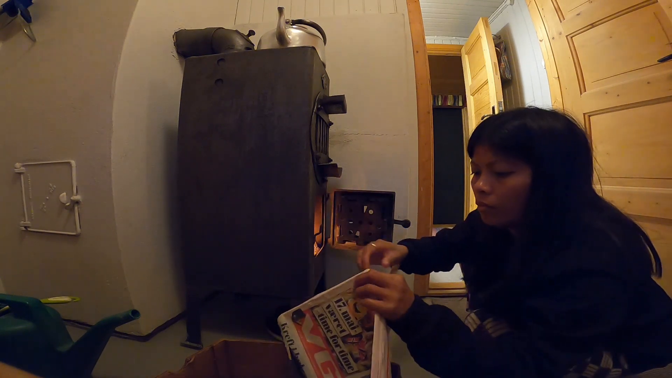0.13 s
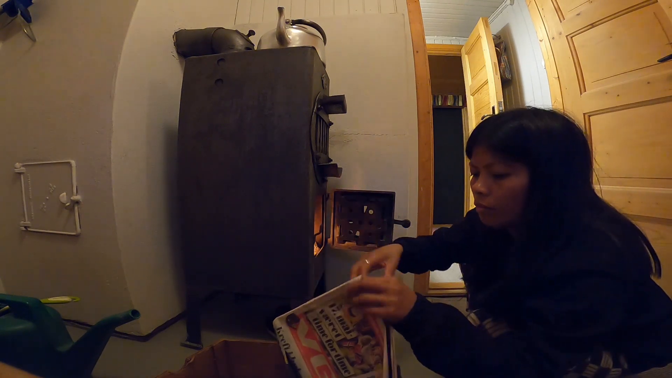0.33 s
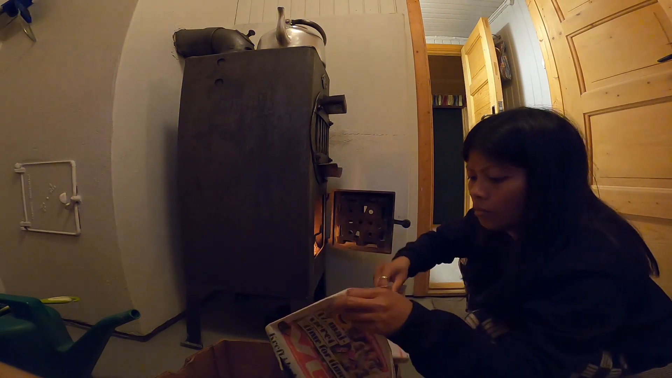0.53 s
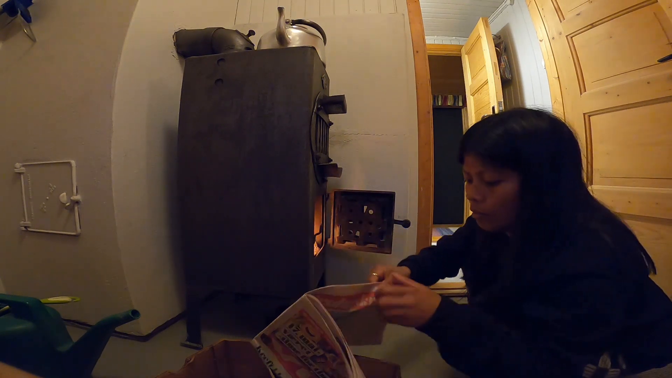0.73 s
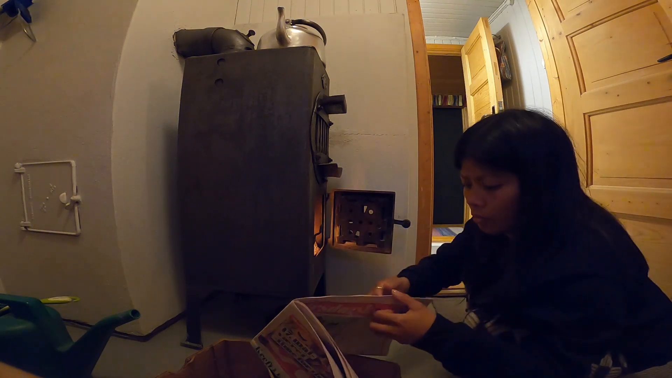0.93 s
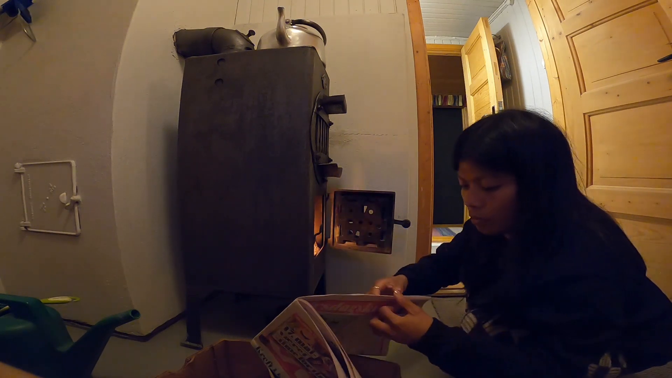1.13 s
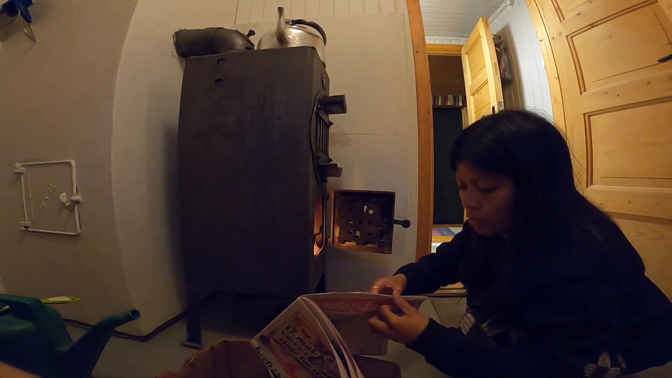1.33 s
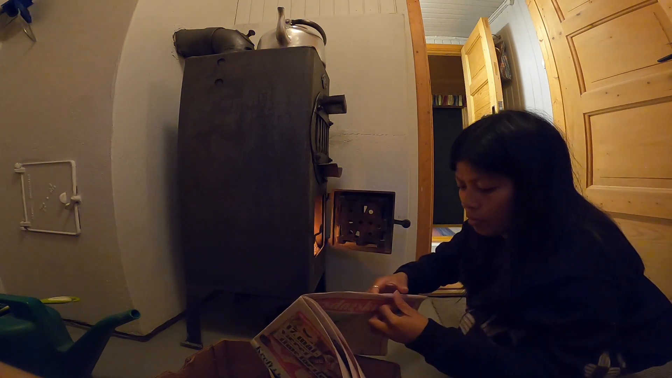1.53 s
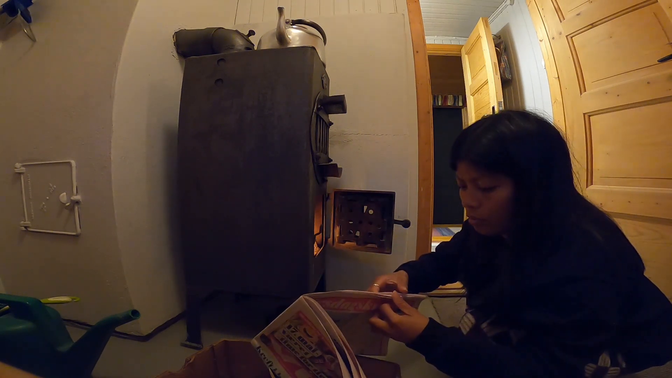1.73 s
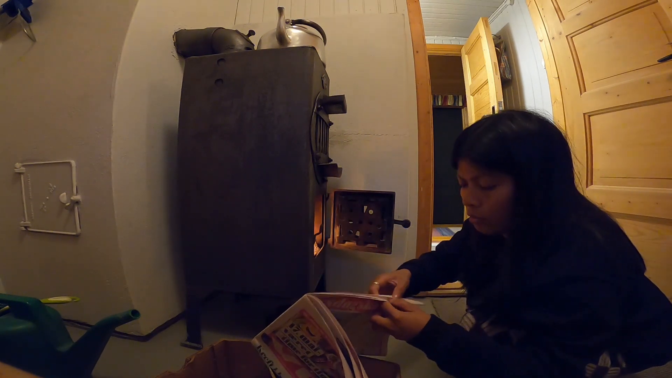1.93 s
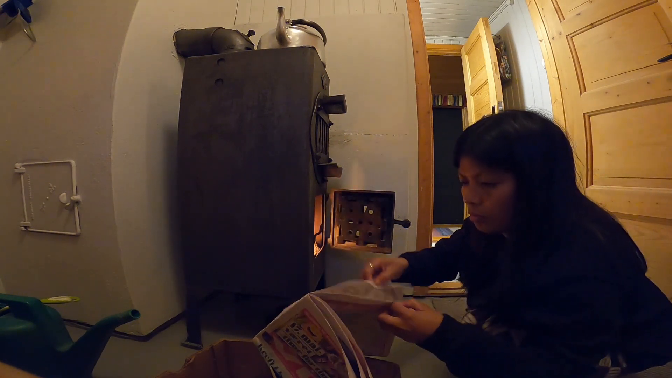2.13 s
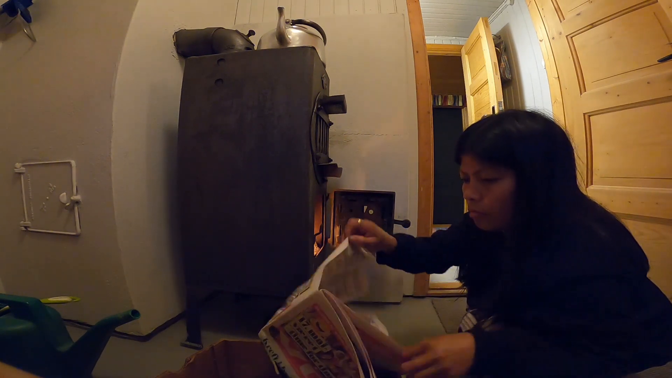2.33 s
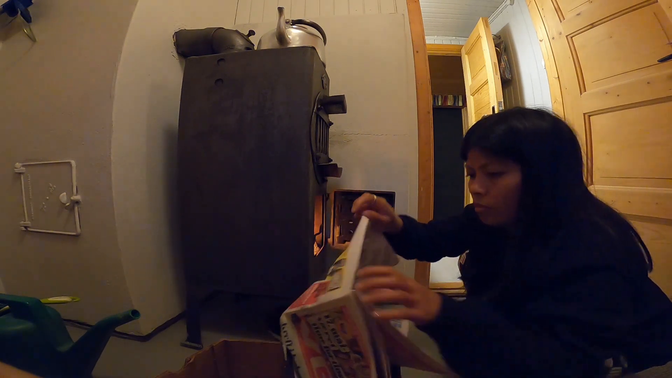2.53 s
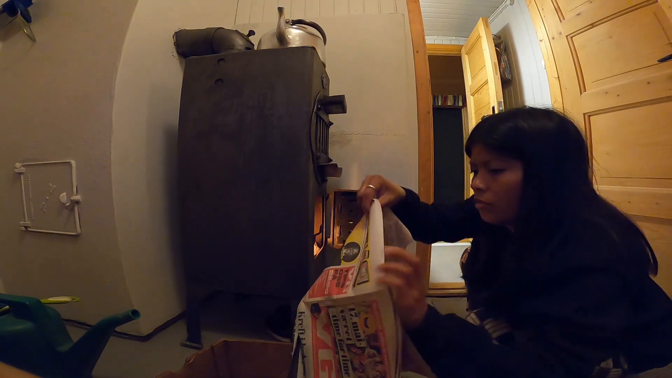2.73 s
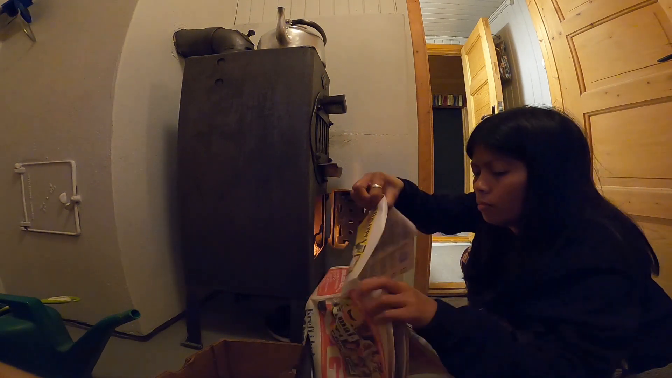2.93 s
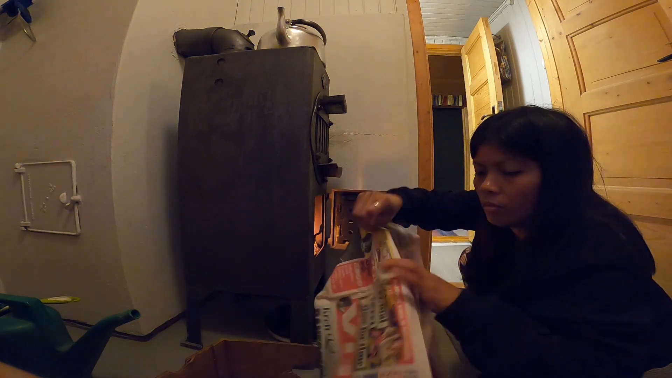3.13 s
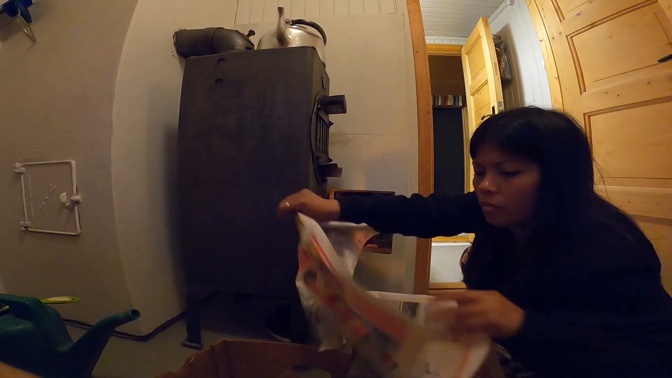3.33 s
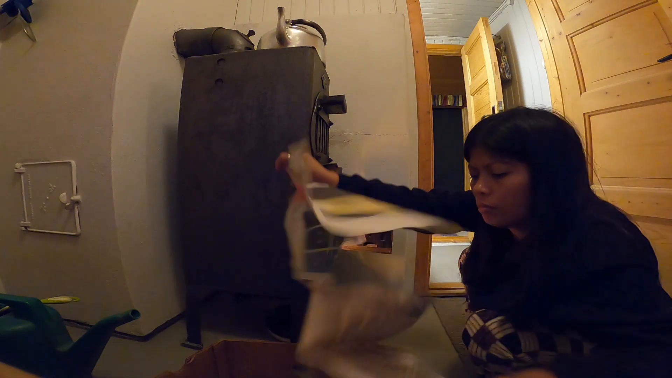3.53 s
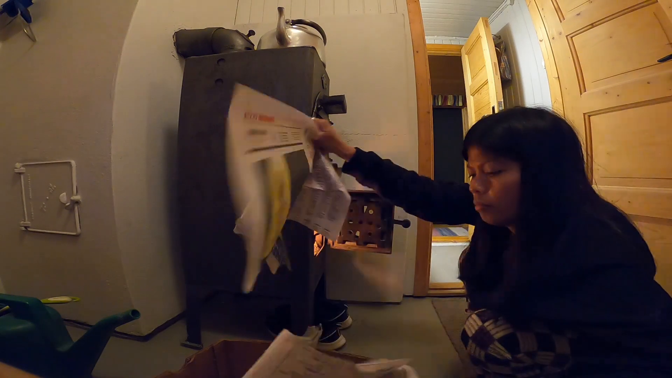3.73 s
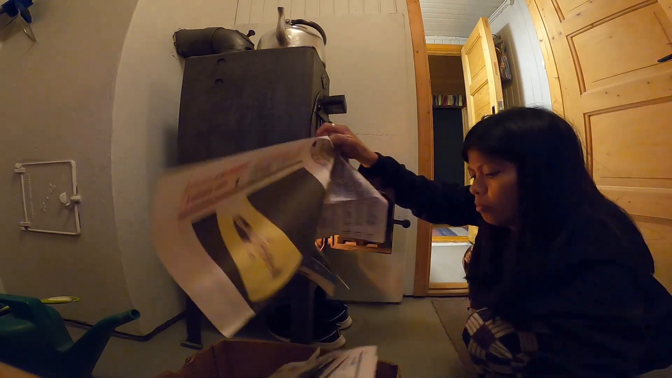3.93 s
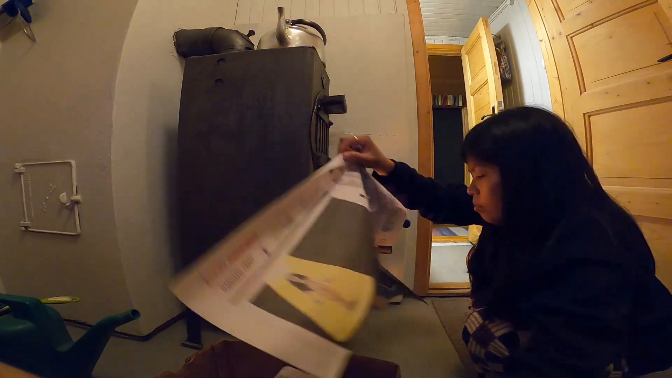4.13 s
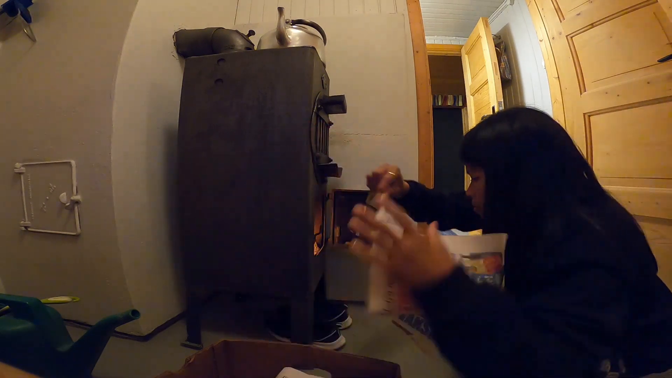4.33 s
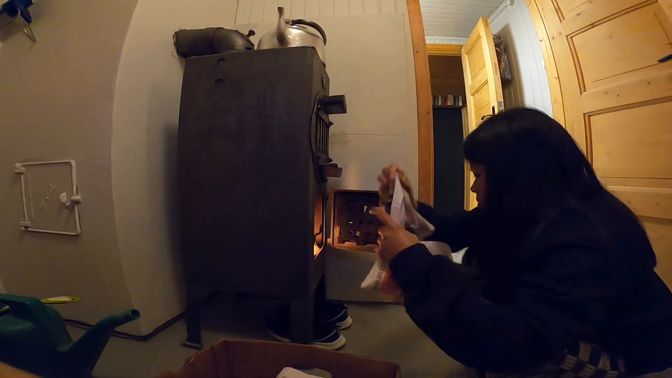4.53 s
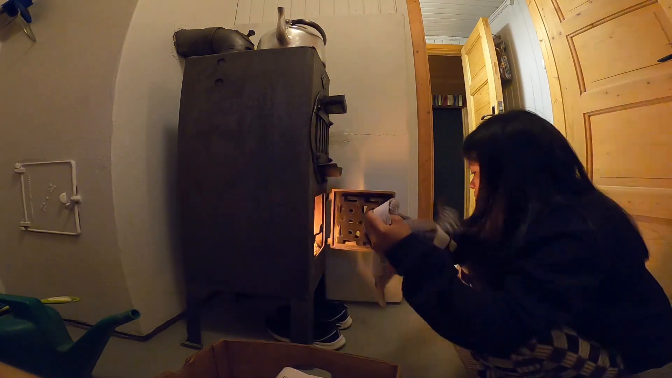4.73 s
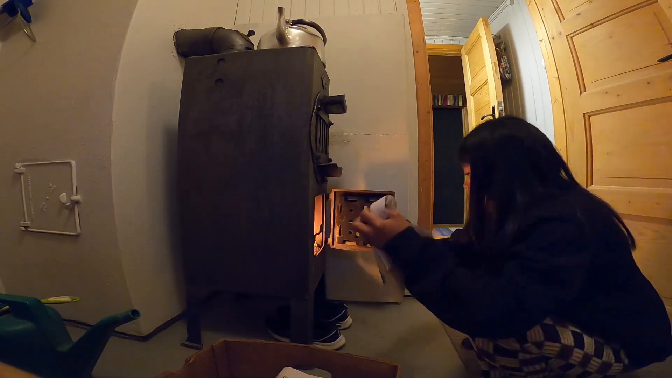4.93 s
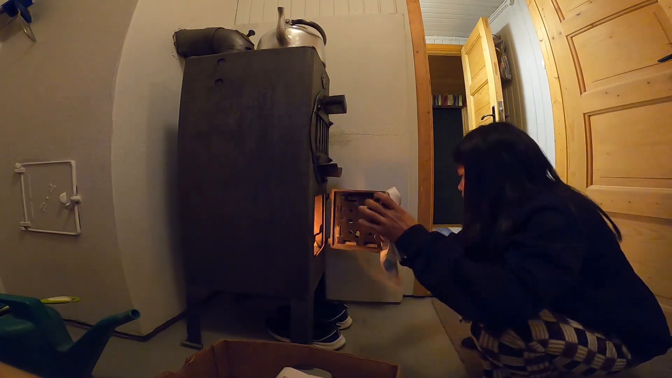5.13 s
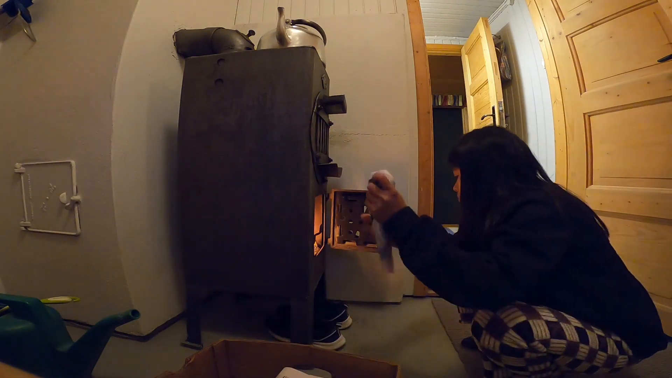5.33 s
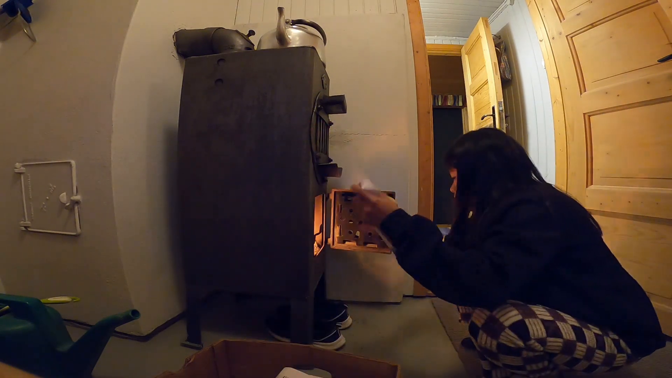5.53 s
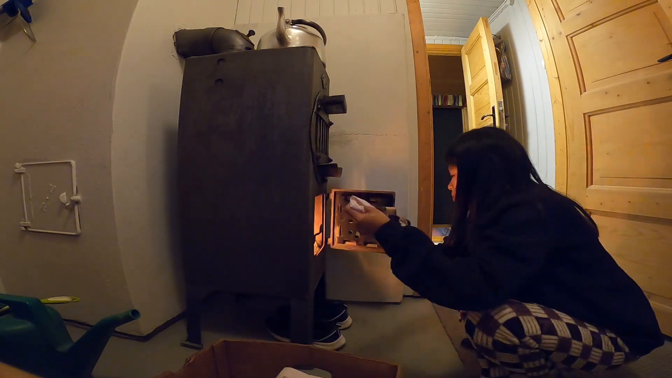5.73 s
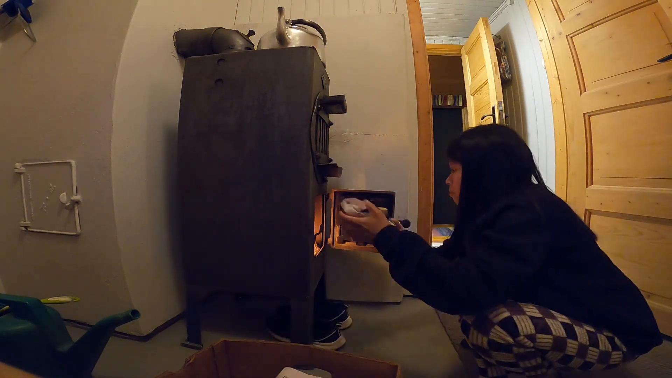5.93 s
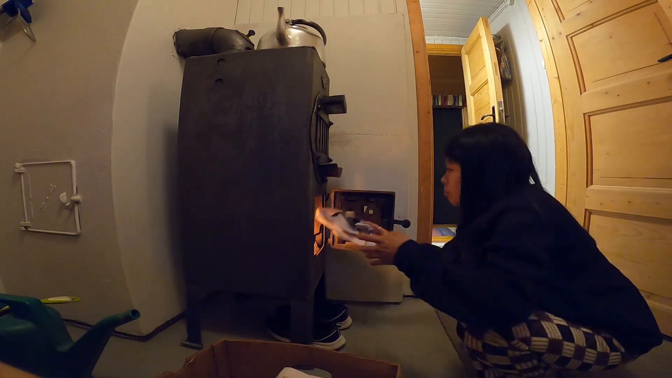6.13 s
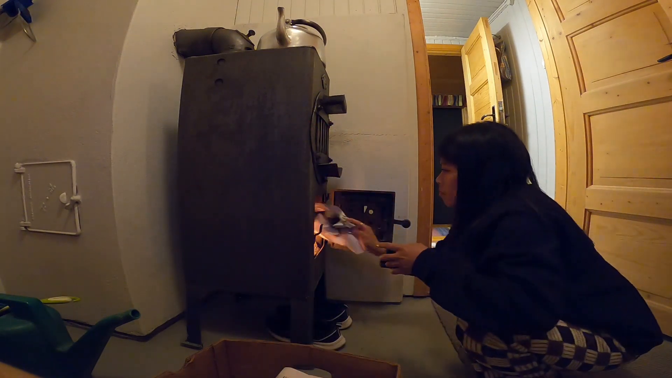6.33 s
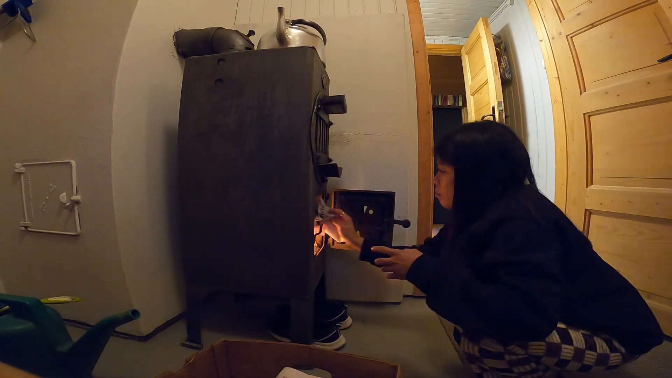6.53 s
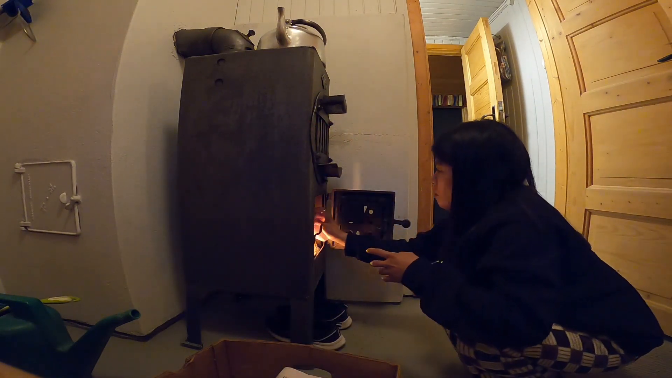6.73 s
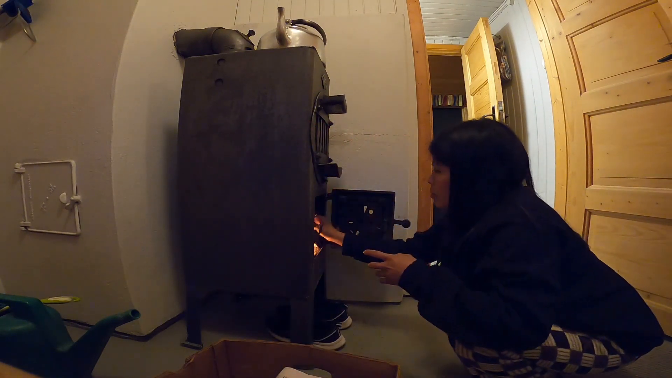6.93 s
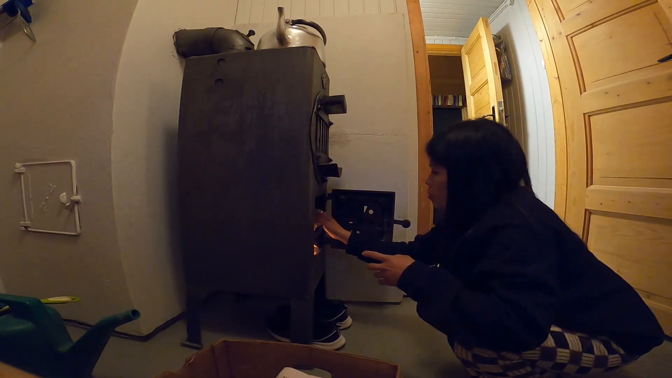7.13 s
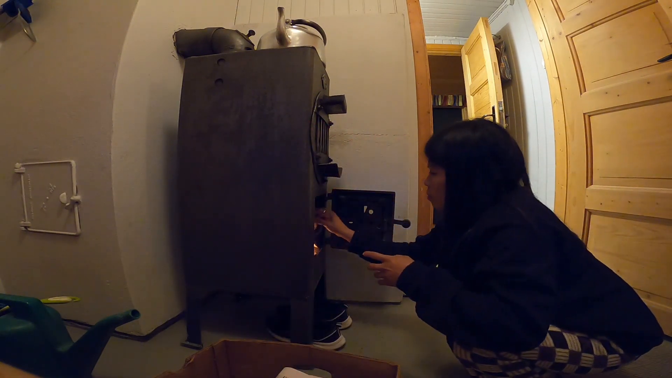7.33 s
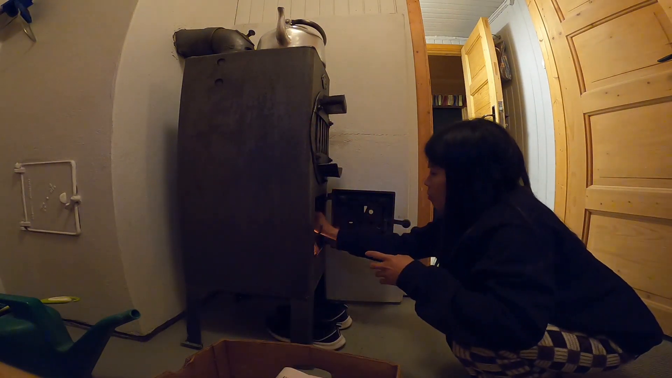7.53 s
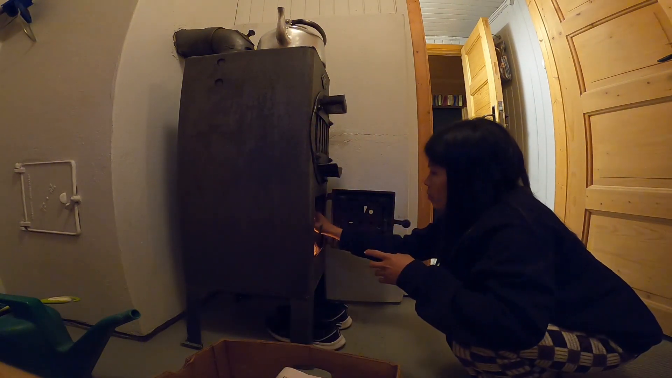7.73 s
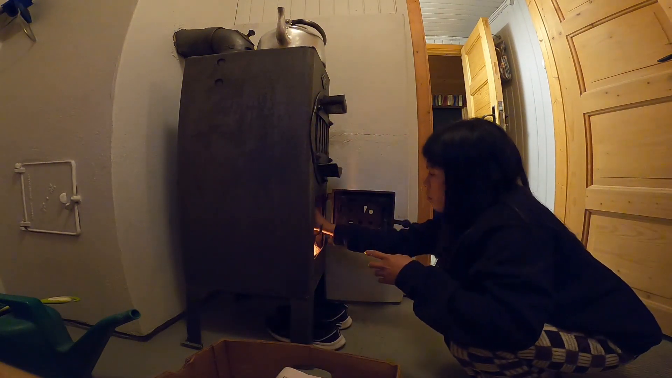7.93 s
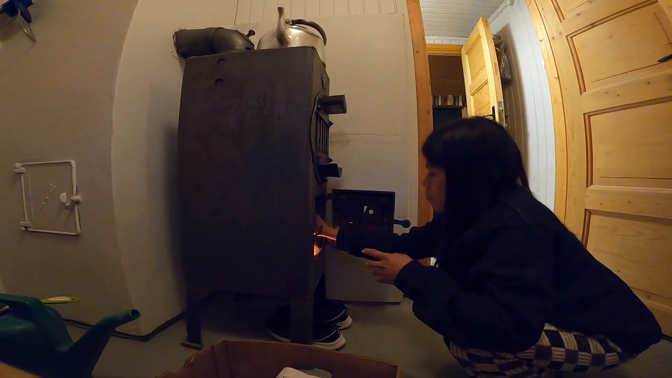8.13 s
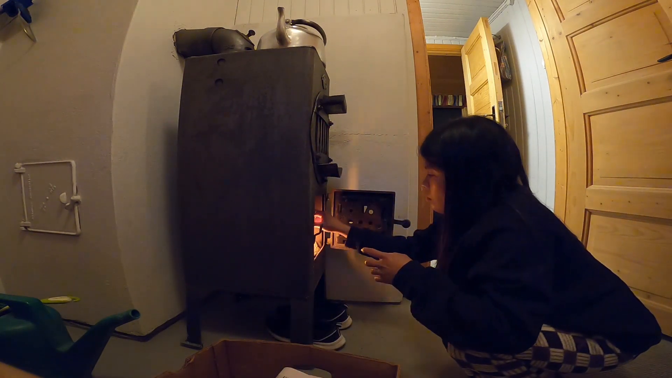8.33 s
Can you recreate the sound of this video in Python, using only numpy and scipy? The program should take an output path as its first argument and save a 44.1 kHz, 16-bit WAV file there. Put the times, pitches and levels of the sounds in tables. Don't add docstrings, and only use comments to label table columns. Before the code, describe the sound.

Newsprint rustles softly, goes almost silent, then is loudly flapped, torn and crumpled into a tight crackle before being quietly pushed into an iron stove.

```python
import sys
import numpy as np
from scipy import signal
from scipy.fft import rfft, irfft, next_fast_len
from scipy.io import wavfile
from scipy.ndimage import uniform_filter1d, map_coordinates

SR = 44100
rng = np.random.default_rng(int(sys.argv[2]) if len(sys.argv) > 2 else 0)


def generate_wav(signal):
    frames = np.transpose(np.atleast_2d(signal))
    scaled = np.clip(frames, -1, 1) * 32767
    pcm = np.round(scaled).astype(np.int16)
    wavfile.write(sys.argv[1], SR, pcm)


def undo_db(level):
    steps = np.asarray(level, float) / 20
    return 10 ** steps


N = 369558

# pitch_hz, level_db (per Hz)
PAPER_COLOUR = [(88, -40), (150, -12), (190, -11), (315, -5.5), (368, -10.5), (589, -7), (649, -9),
                (979, -4.5), (1500, -4.5), (3350, -2.5), (7040, -13.5), (8070, -23), (12700, -34),
                (15300, -44.5), (15700, -72)]


def unit(x):
    return x / np.sqrt(np.mean(x ** 2) + 1e-20)


def steady(x, size):
    power = uniform_filter1d(np.mean(np.atleast_2d(x) ** 2, 0), size=size)
    return x / np.sqrt(np.abs(power) + 1e-20)


def along(points, hz):
    f, v = np.transpose(points)
    return np.interp(np.log(hz + 1), np.log(f + 1), v)


def curves(rows):
    s, *cols = np.transpose(rows)
    return [np.interp(np.arange(N) / SR, s, c) for c in cols]


def wobble(rate):
    knots = rng.standard_normal(int(N * rate / SR) + 4)
    return map_coordinates(knots, [np.arange(N) * rate / SR])


def events_db(level):
    t = np.arange(0, N / SR + .002, .001)
    gain = np.sqrt(np.sum(undo_db(level(t[:, None])) ** 2, 1))
    return np.interp(np.arange(N) / SR, t, gain)


def filtered(x, response):
    m = next_fast_len(x.shape[-1] + 8192)
    spectrum = rfft(x, m) * response(np.fft.rfftfreq(m, 1 / SR))
    return irfft(spectrum, m)[..., :x.shape[-1]]


def causal(points):
    def response(hz):
        cep = irfft(np.log(undo_db(np.maximum(along(points, hz), -70))))
        cep[1:len(cep) // 2] *= 2
        cep[len(cep) // 2 + 1:] = 0
        return np.exp(rfft(cep))
    return response


def spread(pair):
    # pitch_hz, likeness (-1 to 1)
    alike = [(100, .95), (500, .84), (1500, .7), (3000, .62), (5000, .15), (8000, -.3)]

    def turn(hz):
        angle = np.arccos(np.clip(along(alike, hz), -1, 1)) / 2
        return np.array([np.cos(angle), np.sin(angle)])
    mid, side = filtered(pair, turn)
    return np.array([mid + side, mid - side])


def still_room():
    # pitch_hz, level_db (per Hz)
    hiss_colour = [(150, -33.5), (260, -1), (782, -14.5), (1270, -7.5), (3940, -20.5), (7070, -13),
                   (7940, -18.5), (14000, -36.5), (15500, -79)]
    noise = spread(rng.standard_normal((2, N)))
    hiss = unit(filtered(noise, lambda f: undo_db(along(hiss_colour, f))))
    return undo_db(-74 + .6 * wobble(8)) * hiss


def draught():
    # start_s, pitch_hz, level_db
    flue = [(0, 152.2, -60.5), (.5, 158, -72), (1.3, 140, -76), (1.44, 142.7, -71.5), (1.51, 185, -66.5),
            (1.56, 163.8, -69.5), (1.62, 196.7, -68), (1.72, 179.1, -68), (1.87, 200.9, -70),
            (2.0, 195.4, -68.5), (6.2, 165.6, -72), (6.4, 216.1, -70.5), (6.5, 174, -70), (6.6, 216.6, -71),
            (6.72, 182.5, -69), (7.0, 194.8, -65.5), (7.55, 172.7, -68.5), (7.7, 139.9, -81.5),
            (8.38, 141.3, -73)]
    hz, db = curves(flue)
    flutter = wobble(85) + 1j * wobble(85) + 1.1
    turns = np.cumsum(hz + 6 * wobble(11)) / SR
    tone = np.real(flutter * np.exp(2j * np.pi * turns))
    return undo_db(db) * steady(tone, size=1300)


def thumps():
    # start_s, peak_db, pitch_hz
    blows = [
        (.7, -37.5, 124),
        (1.04, -37, 87.3),
        (2.182, -52, 131.7),
        (3.398, -25, 93.06),
        (7.638, -47.5, 92.04),
        (7.68, -51.5, 91.7),
        (7.829, -48.5, 88),
        (8.01, -63.5, 89.9),
        (8.14, -53, 90.14),
        (8.26, -51, 90.8),
    ]
    rise_s, decay_s = 0.019065, 0.01197
    out, t = np.zeros(N + SR), np.arange(SR // 4) / SR
    for s, db, hz in blows:
        swell = t / rise_s * np.exp(-t / decay_s)
        out[round(s * SR):][:len(t)] += undo_db(db + 11) * swell * np.sin(2 * np.pi * hz * t)
    return out[:N]


def flap():
    # start_s, boom_db, puff_db, swing_s (to swell or sink by 20 dB)
    swings = [(.1, -70.5, -80, 2), (.67, -44.5, -67, 0.1758), (.9, -63, -60.5, 0.3794),
              (1.06, -41.5, -64.5, 0.1032), (2.55, -42.5, -63, 0.3353), (3.1, -47, -63.5, 0.1926),
              (3.41, -36, -52.5, 0.3426), (3.65, -41.5, -61, 0.3), (4.3, -50, -49.5, 0.24),
              (4.64, -37, -59, 0.3402), (5.0, -51.5, -67, 0.4), (5.45, -62.5, -76, .12),
              (5.75, -72, -74, .25), (6.33, -76, -74, 0.2809), (6.8, -74, -70.5, 0.3),
              (7.09, -70.5, -72, 0.31), (7.68, -55.5, -71, 0.2044), (7.86, -70, -81.5, 2),
              (8.29, -59, -76, 0.5)]
    # pitch_hz, level_db (per Hz)
    boom_colour = [(26, -39.5), (45, -7), (123, 0), (168, 2.5), (189, -10), (220, 1), (290, -12),
                   (480, -120)]
    # pitch_hz, level_db (per Hz)
    puff_colour = [(8, -33), (22, 5.5), (40, -9), (60, -24), (90, -61)]
    calm_db = -92
    s, boom_db, puff_db, swing_s = np.transpose(swings)
    layers = []
    for peak_db, colour in ((boom_db, boom_colour), (puff_db, puff_colour)):
        level = undo_db(calm_db) + events_db(lambda t: peak_db - 20 * np.abs(t - s) / swing_s)
        air = filtered(spread(rng.standard_normal((2, N))), lambda f: undo_db(along(colour, f)))
        layers.append(level * steady(air * undo_db(4.5 * wobble(13)), size=6000))
    return sum(layers)


def room(x, count=40):
    # pitch_hz, fall_s (time to fall by 60 dB)
    wall_fall = [(150, 0.34), (700, 0.29028), (2000, 0.3), (5000, 0.26), (13000, 0.25)]
    onset_s = 0.00078
    out, step = np.zeros((2, N + SR)), 1280
    hz, t, z = signal.stft(rng.standard_normal((count, 2, SR // 3)), SR, nperseg=256)
    fall = undo_db(-60 * t / along(wall_fall, hz)[:, None])
    tails = signal.istft(z * fall, SR, nperseg=256)[1]
    tails = tails * (1 - np.exp(-np.arange(tails.shape[-1]) / SR / onset_s))
    m = next_fast_len(tails.shape[-1] + 2 * step, real=True)
    walls = rfft(tails / np.linalg.norm(tails[:, :1], axis=2, keepdims=True), m)
    fade = np.sin(np.pi * np.arange(2 * step) / (2 * step))
    for n, start in enumerate(range(0, N - step, step)):
        piece = x[start:start + 2 * step]
        out[:, start:start + m] += irfft(rfft(piece * fade[:len(piece)], m) * walls[n % count], m)
    return spread(out[:, :N])


def hushed(x):
    hush_db, hush_power = -66.5, 0.2327
    level = np.sqrt(np.abs(uniform_filter1d(np.mean(x ** 2, 0), size=900)) + 1e-20)
    return x * np.minimum(level / undo_db(hush_db), 1) ** hush_power


def ticks():
    # start_s, peak_db, pitch_hz
    fibres = [(2.5775, -3.5, 4920), (2.9, -18, 11000), (2.881, -16, 9500), (2.917, -18.5, 6300),
              (2.975, -14, 11213), (3.214, -16.5, 8350), (3.565, -30.5, 10620), (3.627, -20, 9247),
              (3.878, -23, 10786), (3.928, -29, 8900), (4.1, -13, 4541), (5.563, -31, 11500),
              (1.006, -26.5, 7534), (2.543, -33, 8000), (2.632, -24.5, 7100), (2.773, -30, 8000),
              (3.068, -22.5, 8500), (3.272, -25, 8000), (4.4437, -22.5, 7500), (4.5824, -29, 7745),
              (4.402, -16.5, 3000), (4.4075, -12, 3400), (4.482, -20, 3500), (4.652, -9.5, 2870),
              (2.3575, -33.5, 10500), (1.727, -62, 9500), (2.8805, -28, 13000), (2.9175, -31, 12000),
              (6.029, -19, 1500), (5.954, -19, 3100)]
    out, t = np.zeros(N), np.arange(-16, 16) / SR
    for s, db, hz in fibres:
        bell = np.exp(-(hz * t / 1.1) ** 2)
        out[round(s * SR):][:len(t)] += undo_db(db) * np.cos(2 * np.pi * hz * t) * bell
    return out


def clicks(s, hz, turns, gain, pan_db):
    k = np.arange(128)
    phase = np.float32(2 * np.pi * hz[:, None] * k / SR)
    life = phase / np.float32(2 * np.pi * turns[:, None])
    ring = np.cos(phase) * np.sqrt(life) * np.exp(-1.6 * life) * np.hanning(257)[128:256]
    ring = ring / np.abs(ring).max(1, keepdims=True)
    where = (np.round(s * SR).astype(int)[:, None] + k).ravel()
    lag = np.repeat(np.round(pan_db / 4.5).astype(int), len(k))

    def side(db, late):
        rings = (ring * (gain * undo_db(db))[:, None]).ravel()
        return np.bincount(where + 4 + late, rings, N + 256)[:N]
    return np.array([side(pan_db / 2, 0), side(-pan_db / 2, lag)])


def creases():
    # start_s, peak_db, ring_hz, avalanche_db (re peak)
    dry_creases = [(1.006, -15, 2150, -12), (1.276, -38.5, 1900, -1), (1.429, -63, 1281, -4),
                   (1.726, -58, 3774, -12.5), (2.413, -22.5, 2489, -5), (2.632, -15, 4070, -16),
                   (2.86, -19.5, 1500, -11.5), (2.881, -17.5, 3090, -2.5), (2.975, -18.5, 3120, -4.5),
                   (3.058, -14.5, 2382, -4), (3.208, -16, 3510, -8.5), (3.406, -14, 2084, -22),
                   (3.627, -14.5, 2362, -16.5), (4.012, -23, 2275, -29), (4.049, -26.5, 1850, -2.5),
                   (4.426, -12, 2597, -15), (4.575, -15.5, 1930, -6), (4.649, -14, 2819, -30),
                   (5.685, -19, 2220, -16), (5.887, -25, 3100, -4), (5.953, -28, 2019, -9),
                   (6.986, -31.5, 1720, -9), (7.374, -47, 3229, -6), (7.592, -39.5, 1686, -5.5),
                   (7.87, -41.5, 1654, -6), (8.266, -36, 1615, -12)]
    plain_creases = [(.153, -28, 2380, -4), (.186, -17, 1492, -5.5), (.582, -29, 1673, -7.5),
                     (1.564, -49.5, 1300, -3.5), (2.036, -42.5, 2091, -25), (2.102, -28.5, 3476, -8),
                     (2.166, -35.5, 1320, -5), (2.182, -31, 1785, -7), (2.239, -31, 1868, -2),
                     (2.286, -27, 2450, -9), (2.452, -10.5, 3300, -14.5), (2.696, -16.5, 3110, -12),
                     (2.764, -19, 2090, -9.5), (2.787, -18.5, 3270, -10.5), (3.168, -12.5, 3700, -12),
                     (3.338, -18, 1715, -12), (3.927, -13, 3676, -7.5), (4.088, -15, 3772, -9.5),
                     (4.155, -16, 2723, -21), (4.276, -19, 1580, -18), (4.365, -20, 2250, -15),
                     (6.226, -28, 3200, -12.5), (6.729, -35.5, 2895, -7), (7.053, -26, 2796, -8),
                     (7.404, -38.5, 4305, -12.5), (8.33, -35, 2600, -12)]
    limp_creases = [(.052, -29, 2742, -28.5), (.496, -25.5, 1590, -15.5), (.638, -14, 1616, -11),
                    (.693, -18, 970, -27), (1.0115, -13, 3701, -19), (1.216, -38.5, 2237, -6),
                    (2.325, -18.5, 3266, -18.5), (2.357, -14.5, 2618, -23), (4.735, -8.5, 1790, -35),
                    (3.073, -7.5, 4291, -23), (3.795, -26, 3348, -9), (4.204, -21.5, 967.5, -19),
                    (4.402, -10, 2380, -28), (4.407, -11, 3262, -30), (4.445, -7, 3600, -22),
                    (4.493, -8, 2443, -27), (5.408, -14.5, 1070, -19), (6.029, -18, 1700, -13),
                    (6.539, -42.5, 2650, -12), (6.59, -32, 3625, -27.5), (7.902, -29.5, 4053, -22.5)]
    # start_s, peak_db, ring_hz
    small_pops = [(.388, -42, 2710), (1.062, -21, 2500), (1.535, -63, 3230), (1.636, -52.5, 2070),
                  (1.847, -62.5, 2500), (1.942, -49, 1682), (1.972, -53, 1335), (2.918, -8.5, 3530),
                  (3.232, -18, 3660), (3.256, -15.5, 3140), (3.289, -5, 3400), (3.313, -12.5, 1980),
                  (3.435, -13, 1850), (3.547, -9, 2670), (3.644, -15, 3140), (3.691, -13, 3100),
                  (3.706, -11.5, 3430), (3.813, -15, 2630), (3.832, -23.5, 3050), (3.983, -18.5, 2283),
                  (4.064, -16, 3830), (4.258, -26, 990), (4.296, -19, 1255), (4.32, -27.5, 1160),
                  (4.347, -27, 1723), (4.481, -10.5, 2020), (4.504, -6.5, 3250), (4.636, -10.5, 2380),
                  (4.678, -8.5, 3250), (4.698, -15, 1720), (4.787, -9, 2370), (4.873, -13, 3440),
                  (4.895, -16, 2330), (4.949, -7.5, 2970), (5.02, -13.5, 3798), (5.133, -19, 2070),
                  (5.149, -21, 3570), (5.18, -13.5, 3830), (5.243, -9, 1675), (5.312, -12, 3434),
                  (5.449, -16, 2410), (5.511, -10, 1492), (5.563, -15, 3530), (5.617, -15, 2201),
                  (5.635, -17.5, 2970), (5.652, -24, 3100), (5.762, -27, 2240), (5.788, -18.5, 3477),
                  (5.811, -22, 2144), (5.998, -29, 2200), (6.067, -28.5, 2843), (6.411, -37, 2409),
                  (6.447, -35, 2250), (6.472, -33.5, 2500), (6.646, -31.5, 3573), (6.845, -46, 1900),
                  (7.195, -23, 3700), (7.252, -31.5, 2072), (7.606, -37.5, 3360), (7.75, -23.5, 2020)]
    pops = [(s, db - 3.5, hz, -23.5) for s, db, hz in small_pops]
    rows = []
    for kind, crack_db in ((dry_creases, -23.5), (plain_creases, -33), (limp_creases, -40.5), (pops, -38.5)):
        rows += [(*crease, crack_db) for crease in kind]
    return np.transpose(rows)


def snaps():
    # start_s, peak_db, pitch_hz
    slaps = [(0.052, -33.5, 460.5), (0.186, -24.5, 630), (0.635, -27, 792.9), (2.285, -40, 277),
             (2.512, -28.5, 326), (2.763, -31, 467), (2.859, -30.5, 502.6), (3.056, -24.5, 320),
             (3.416, -20, 317), (3.927, -27, 765.2), (4.426, -22, 580), (5.64, -25, 651),
             (5.876, -28.5, 740), (7.065, -44, 735.9), (6.73, -54, 802), (7.701, -46.5, 330),
             (7.77, -44, 380), (7.86, -53.5, 300), (8.143, -38.5, 477.4)]
    slap_low_hz = 130
    s, db, hz, _, crack_db = creases()
    draw = rng.random((len(s), 4))
    sign, pan_db = np.sign(draw[:, 0] - .5), 5 * (draw[:, 3] - .5)
    ring = clicks(s, hz, 1.5 + draw[:, 1], sign * undo_db(db + 2.5), pan_db)
    echo_s = s + 0.0007992 + .0009 * draw[:, 2]
    echo = clicks(echo_s, 1.55 * hz, 1.2 + 0 * s, -sign * undo_db(db + 1.5), -pan_db)
    crack = clicks(s, 9500 + 0 * s, .7 + 0 * s, sign * undo_db(db + crack_db + 40), 2.5 * pan_db)
    s, db, hz = np.transpose(slaps)
    slap = clicks(s, hz, 2.6 + 0 * s, undo_db(db + 3.5), 0 * s)
    slap = filtered(slap, lambda f: (1j * f / (1j * f + slap_low_hz)) ** 3)
    return filtered(ring + echo + crack, causal(PAPER_COLOUR)) + slap


def avalanche():
    rise_s, decay_s = 0.0012, 0.0075
    s, db, _, after_db, _ = creases()
    kicks = np.bincount(np.round(s * SR).astype(int), undo_db(db + after_db), N)
    t = np.arange(SR // 8) / SR
    burst = np.exp(-t / decay_s) * (1 - np.exp(-t / rise_s))
    return signal.fftconvolve(kicks, burst)[:N]


def hands():
    # start_s, level_db
    fingers = [(0, -43), (.25, -48), (.37, -49), (.93, -43.5), (.99, -51), (1.37, -78.5), (1.57, -74.5),
               (1.82, -80.5), (2.0, -66), (2.6, -46), (4.36, -46), (5.0, -34), (5.36, -29), (5.6, -30),
               (5.75, -33), (6.12, -38.5), (6.19, -52), (6.45, -52), (6.89, -54.5), (7.35, -61.5),
               (7.54, -69), (7.84, -55.5), (8.38, -44.5)]
    # start_s, length_s, start_db, end_db
    peel = [(0.019, 0.04422, -41.5, -32), (0.16, 0.03127, -44, -42.5), (0.542, 0.0998, -44.5, -31.5),
            (0.674, 0.13, -36, -44), (1.002, 0.0295, -38.5, -41.5), (1.04, 0.19, -40, -64),
            (1.424, 0.0364, -69.5, -70), (1.599, 0.044, -68, -72), (1.672, 0.02956, -67.5, -77.5),
            (1.72, 0.02747, -66, -71.5), (1.872, .05, -67.5, -69.5), (2.037, 0.0827, -60.5, -47),
            (2.128, 0.153, -46.5, -43)]
    shake = [(2.35, .012, -29, -26.5), (2.365, 0.0747, -33.5, -34.5), (2.455, 0.02933, -29, -35.5),
             (2.508, 0.049, -31.5, -21.5), (2.553, 0.018, -22.5, -28), (2.575, 0.11493, -31, -28),
             (2.7, 0.089, -34, -24.5), (2.885, 0.05, -34, -42), (2.985, 0.05954, -33, -34),
             (3.07, 0.082, -27, -27), (3.168, 0.078, -22.5, -32), (3.255, 0.035, -24.5, -19.5),
             (3.3, 0.03178, -25, -25.5), (3.338, 0.061, -20, -20.5), (3.385, 0.053, -20.5, -20),
             (3.445, 0.023, -33, -31.5), (3.48, 0.03209, -22.5, -17.5), (3.519, 0.07158, -19.5, -32.5),
             (3.635, 0.061, -21.5, -21.5), (3.7, 0.15, -24.5, -39), (3.875, 0.0454, -27.5, -31.5),
             (3.94, 0.055, -39.5, -38.5), (4.075, 0.181, -36, -39), (4.27, 0.02286, -32.5, -31.5)]
    crumple = [(4.424, 0.0928, -24.5, -24.5), (4.525, .035, -28, -28), (4.568, 0.038, -21.5, -19),
               (4.625, 0.03024, -24, -23), (4.665, 0.088, -22.5, -22), (4.775, 0.02578, -21.5, -24),
               (4.81, 0.07823, -22, -22.5), (4.895, .04, -22, -22), (4.94, 0.07063, -21.5, -23.5),
               (5.06, 0.073, -25.5, -24), (5.149, 0.17, -24.5, -24.5), (5.379, 0.19, -26.5, -25),
               (5.619, 0.12, -23, -29), (5.765, 0.07257, -27.5, -30.5), (5.855, 0.028, -26, -23),
               (5.89, 0.12137, -28, -33.5), (6.03, 0.05739, -31, -33), (6.1, 0.04941, -30.5, -31)]
    stuff = [(6.2, 0.1427, -45.5, -46), (6.53, 0.08, -47, -50), (6.75, 0.082, -51.5, -49),
             (6.91, 0.03452, -50.5, -47), (6.98, 0.1077, -46, -38.5), (7.1, 0.11057, -45, -41.5),
             (7.57, 0.022, -62, -54), (7.61, 0.0652, -48, -34), (7.69, 0.08667, -39.5, -42),
             (7.96, 0.0516, -51.5, -48.5), (8.07, 0.078, -52, -35.5), (8.25, 0.14, -49, -38.5)]
    seize_db_per_s, let_go_db_per_s = 1197.5, 602
    s, length, start_db, end_db = np.transpose(peel + shake + crumple + stuff)

    def grip_db(t):
        lean = start_db + (end_db - start_db) * np.clip((t - s) / length, 0, 1)
        before, after = np.maximum(s - t, 0), np.maximum(t - s - length, 0)
        return lean - seize_db_per_s * before - let_go_db_per_s * after
    return np.hypot(events_db(grip_db), undo_db(curves(fingers)[0]))


def voices(f):
    box_hz, box_width_hz = 994.4, 61.47
    body = 1 / (1 + (f / 935) ** 44)
    bright = 1 - 1 / (1 + (f / 4600) ** 6)
    crisp = 1 - 1 / (1 + (f / 7800) ** 20)
    box = 1j * f * box_width_hz / (box_hz ** 2 - f * f + 1j * f * box_width_hz)
    return np.array([body, bright, crisp, box * (1 - body)])[:, None]


def crackle(count=28000):
    # start_s, body_db (re crackle)
    sheet = [(0, -7), (.14, -17.5), (.53, -18), (.67, -11), (1.1, -11.5), (1.17, -24), (1.3, -18),
             (1.93, -14), (2.1, -16.5), (2.46, -16), (2.56, -14), (3.0, -12), (3.59, -14.5), (3.8, -10),
             (4.08, -20.5), (4.36, -7), (4.41, -21.5), (4.64, -12), (5.3, -16.5), (5.93, -19.5),
             (6.3, -24.5), (6.9, -28.5), (7.07, -15.5), (7.3, -18.5), (7.7, -17), (7.88, -27), (8.05, -19),
             (8.14, -12), (8.38, -12)]
    # start_s, brightness_db
    taut = [(0, -2.5), (.21, -2), (.64, 0), (1.0, 0), (1.2, -2.5), (1.45, 2.5), (1.6, -5), (1.73, 7),
            (1.84, -4), (2.1, 2), (2.45, -4), (2.92, 4.5), (3.3, -0.5), (3.62, -0.5), (3.9, -3),
            (4.1, -1.5), (4.36, -2.5), (4.64, 1), (5.5, -1), (5.64, -3), (5.9, 0), (6.4, -2), (6.95, 4.5),
            (7.2, -0.5), (7.45, 2), (8.0, 3)]
    # start_s, level_db
    firebox_near = [(0, -13.5), (4.5, -14.5), (4.8, -1), (5.1, -9), (5.45, 6.5), (5.58, 5), (5.64, -4.5),
                    (6.1, -18), (8.38, -11)]
    draw = rng.random((count, 5))
    s = draw[:, 0] * (N - 1) / SR
    clump_db = 3.9 * wobble(40) + 1.72 * wobble(160)
    size_db = -3.6 * np.log(draw[:, 1] + .045) + clump_db[(s * SR).astype(int)]
    hz = 300 + 15500 * draw[:, 2] ** 1.4543
    sign = np.sign(draw[:, 3] - .5)
    pan_db = 6 * (np.abs(draw[:, 3] - .5) * 4 - 1)
    swarm = clicks(s, hz, .5 + 1.71 * draw[:, 4], sign * undo_db(size_db) * np.sqrt(hz / 3000), pan_db)
    swarm = filtered(swarm, lambda f: causal(PAPER_COLOUR)(f) * undo_db(1.22 * np.log2(f / 2000 + 0.28)))
    swarm = steady(swarm, size=1100)
    body_db, = curves(sheet)
    taut_gain, near_db = undo_db(curves(taut)[0]), curves(firebox_near)[0]
    crisp_db = 1 - 0.25 * np.abs(body_db + 19.5)
    body, bright, crisp, box = filtered(swarm, voices)
    shaped = swarm + bright * (taut_gain - 1) + box * undo_db(near_db + 0.5)
    shaped = shaped + body * (undo_db(body_db + 13) - 1)
    shaped = shaped + crisp * (undo_db(crisp_db) - 1) * taut_gain
    return (undo_db(-5.0) * hands() + avalanche()) * shaped


def scene():
    swarm, single = crackle(), snaps()
    into_room = (swarm + undo_db(-2.5) * single).mean(0)
    air = swarm + single + undo_db(2.03) * room(into_room) + still_room()
    lows = flap() + thumps() + draught()
    return hushed(air + ticks()) + lows


def top_cut(x):
    return signal.sosfilt(signal.butter(12, 16670, fs=SR, output="sos"), x)


def record(dry):
    # pitch_hz, left_right_db
    ports = [(60, 3), (200, 1.5), (700, 0), (1400, 1.5), (2800, 3), (5600, 2.5), (8000, -1.5),
             (10000, -3.5), (14000, -2)]
    late_samples = 1.6878

    def response(f):
        half = undo_db(along(ports, f) / 2) * np.exp(-1j * np.pi * f * late_samples / SR)
        top = 1 / (1 + (f / 16600) ** 100)
        return top * np.array([half, 1 / half])
    return top_cut(filtered(dry, response))


dry = scene()
out = record(dry)
generate_wav(out)
```